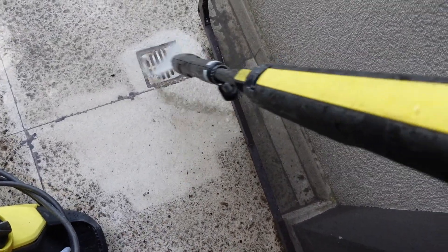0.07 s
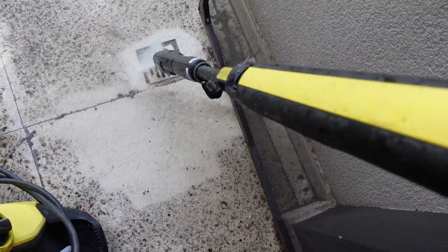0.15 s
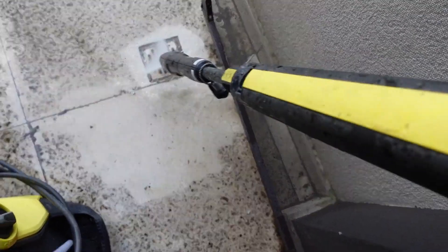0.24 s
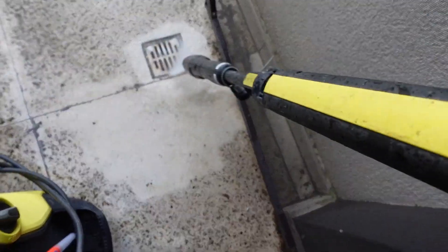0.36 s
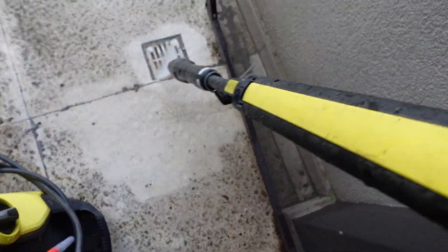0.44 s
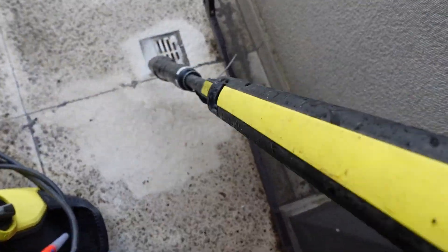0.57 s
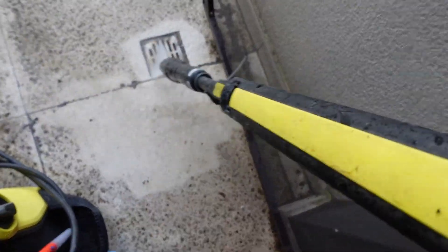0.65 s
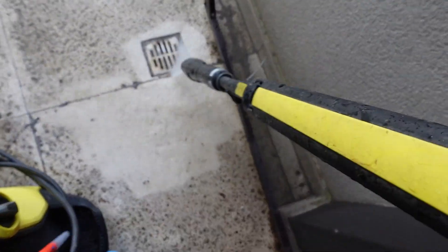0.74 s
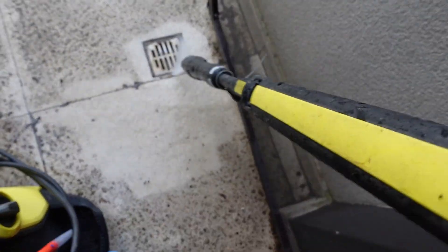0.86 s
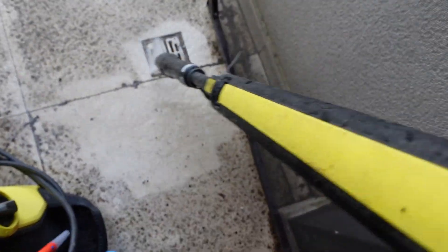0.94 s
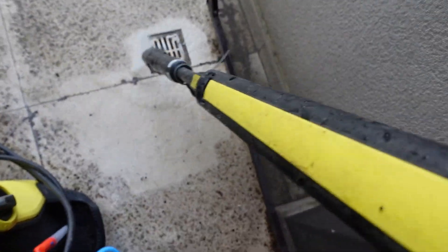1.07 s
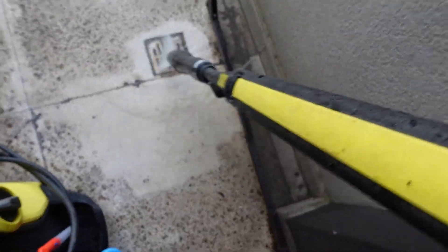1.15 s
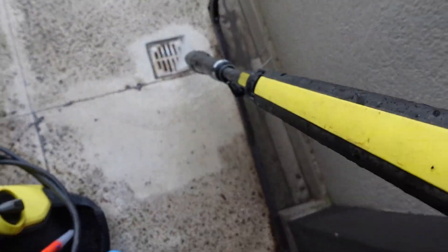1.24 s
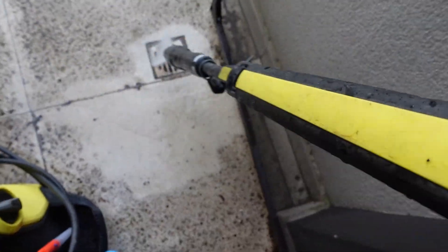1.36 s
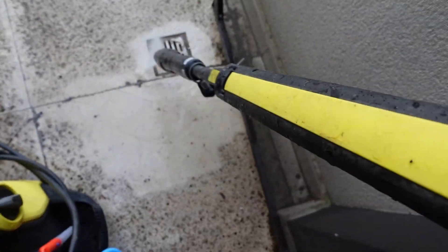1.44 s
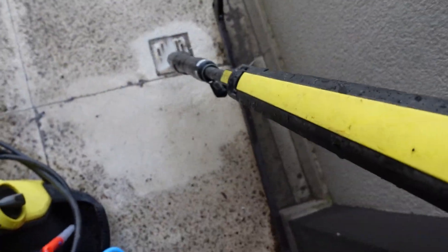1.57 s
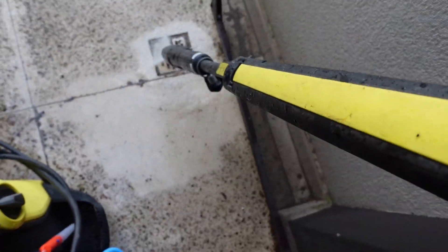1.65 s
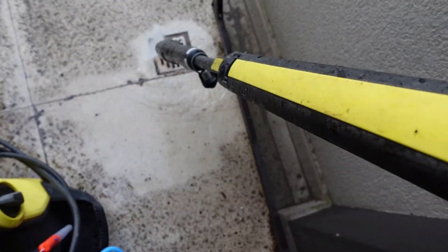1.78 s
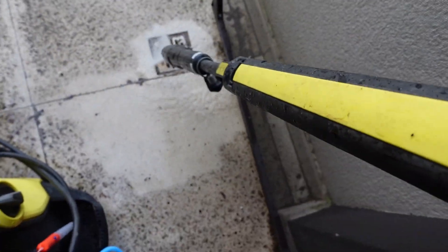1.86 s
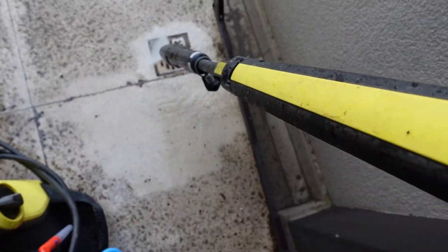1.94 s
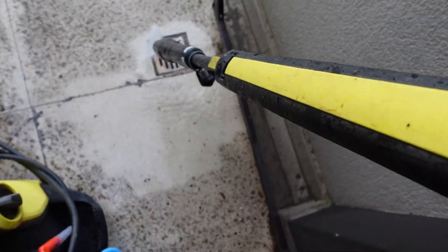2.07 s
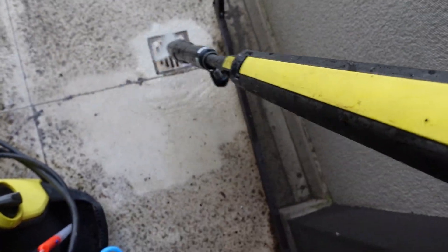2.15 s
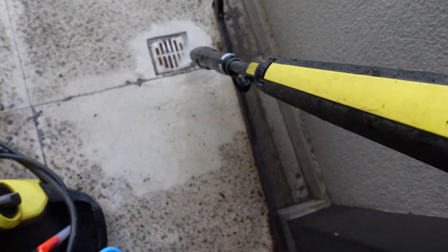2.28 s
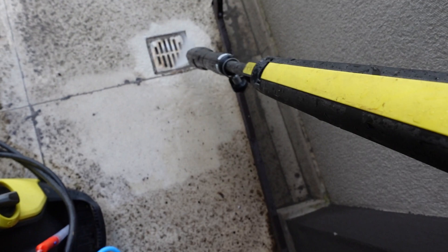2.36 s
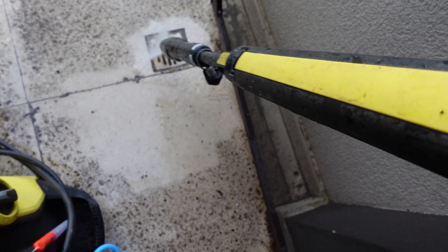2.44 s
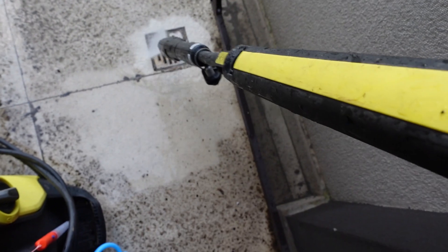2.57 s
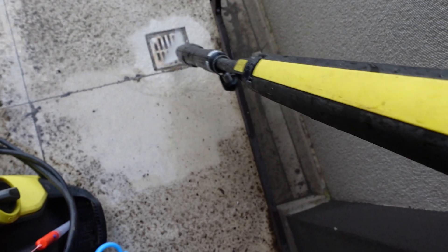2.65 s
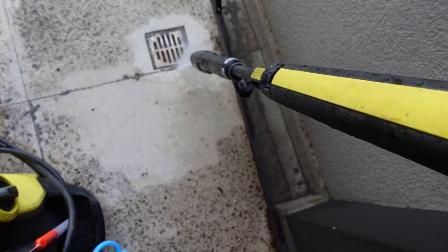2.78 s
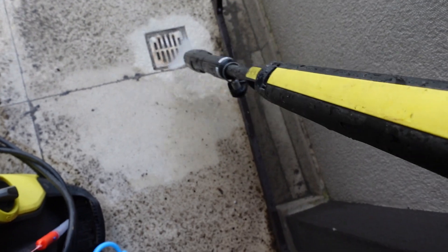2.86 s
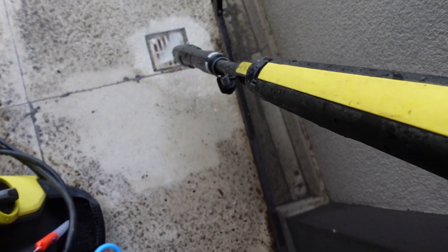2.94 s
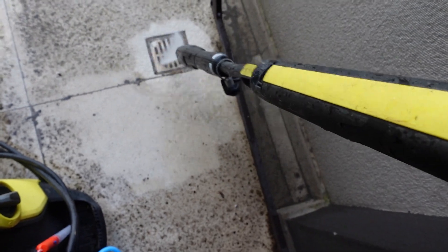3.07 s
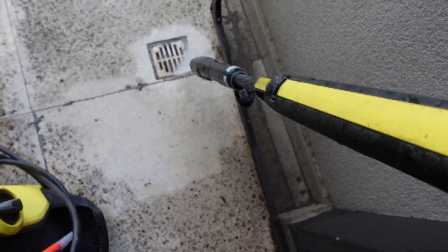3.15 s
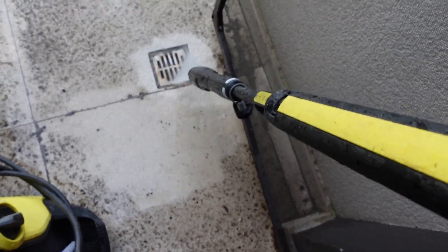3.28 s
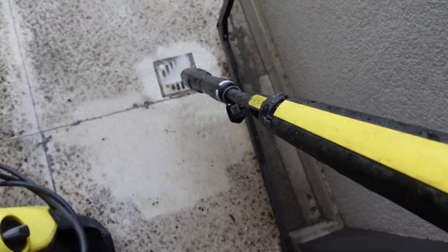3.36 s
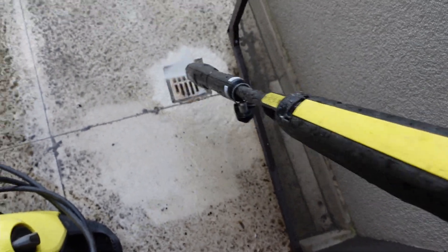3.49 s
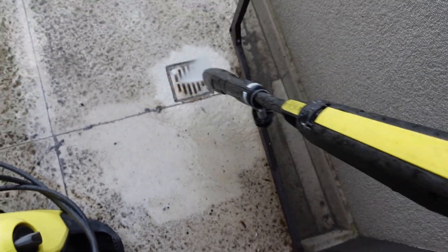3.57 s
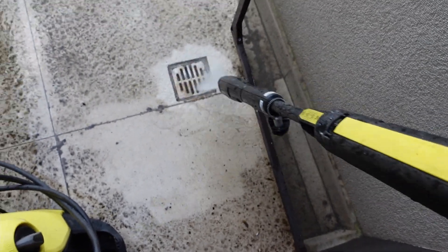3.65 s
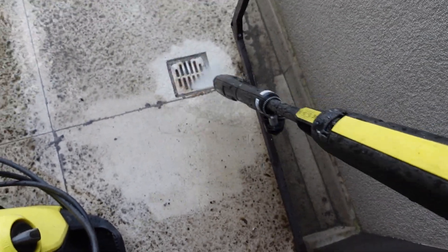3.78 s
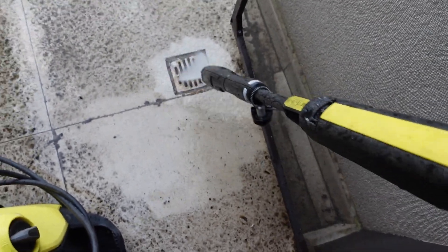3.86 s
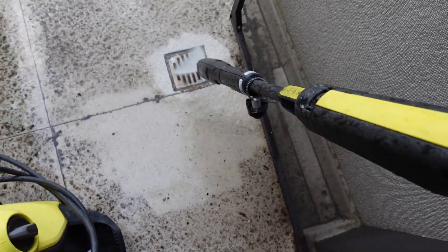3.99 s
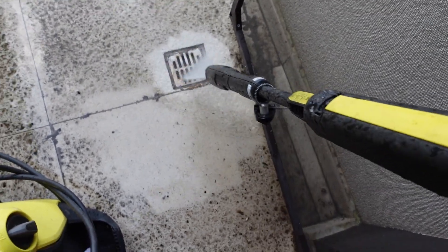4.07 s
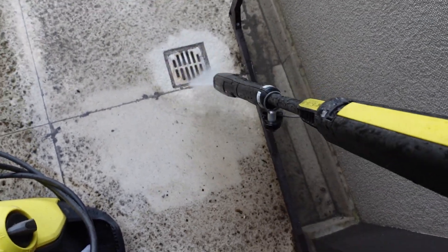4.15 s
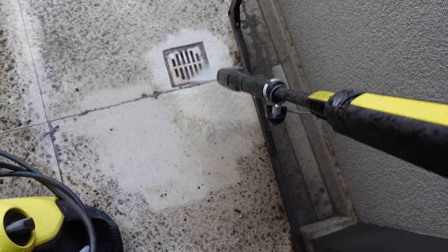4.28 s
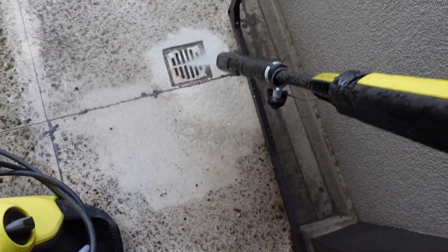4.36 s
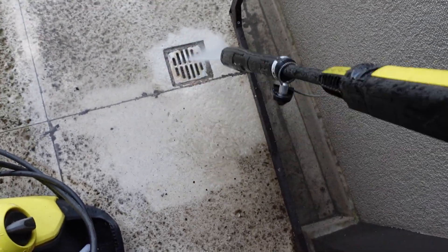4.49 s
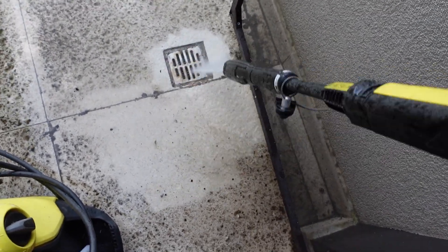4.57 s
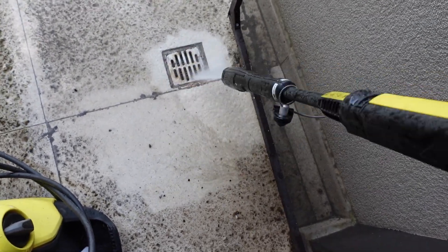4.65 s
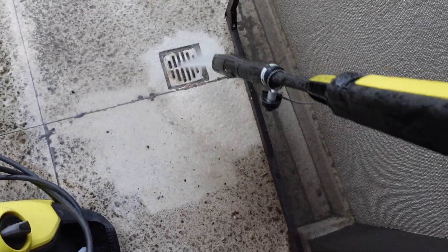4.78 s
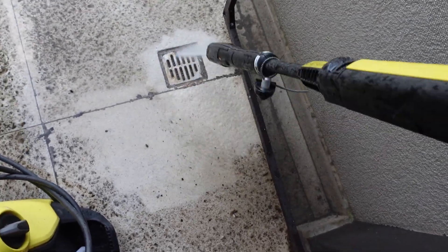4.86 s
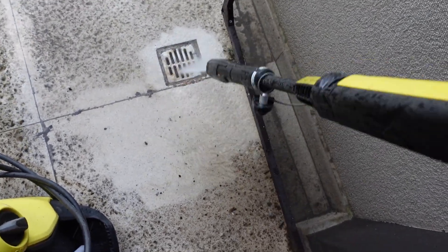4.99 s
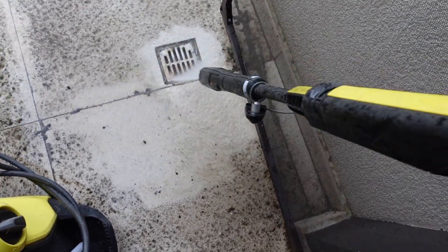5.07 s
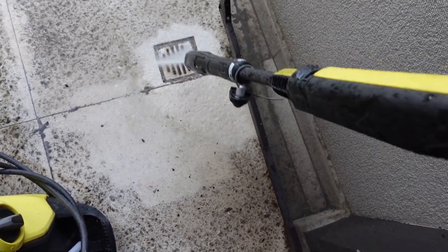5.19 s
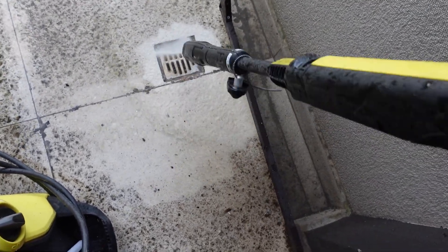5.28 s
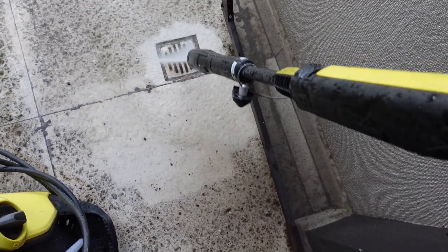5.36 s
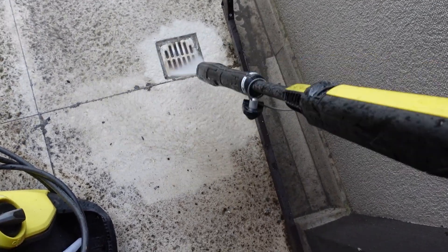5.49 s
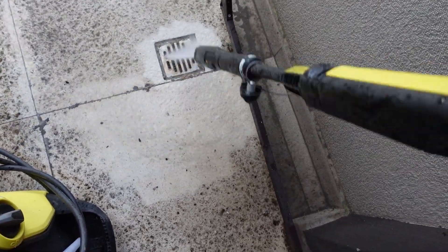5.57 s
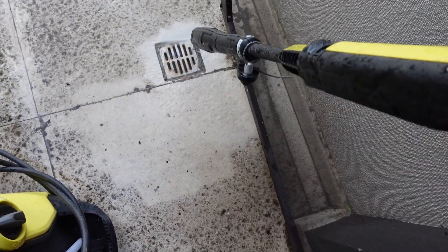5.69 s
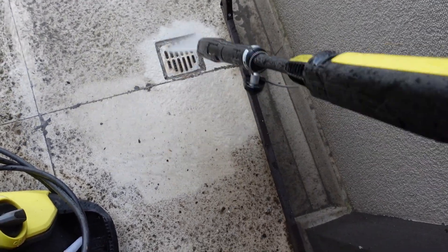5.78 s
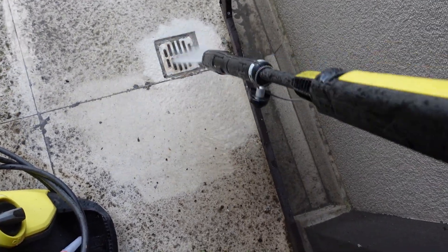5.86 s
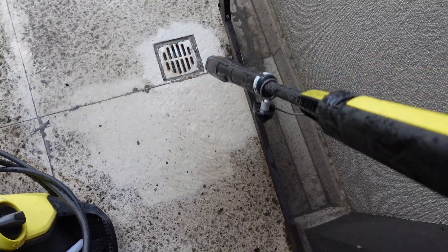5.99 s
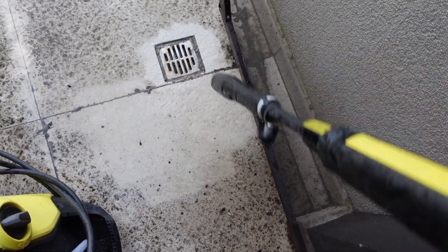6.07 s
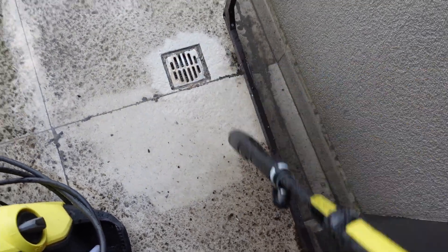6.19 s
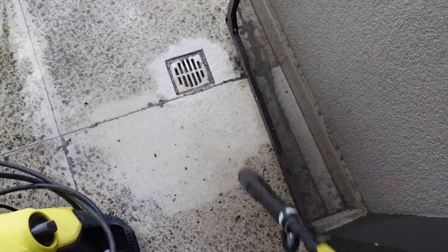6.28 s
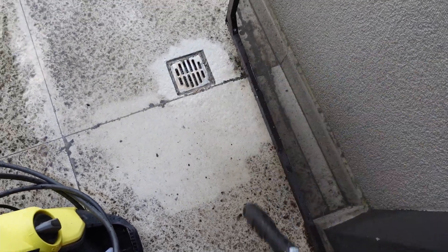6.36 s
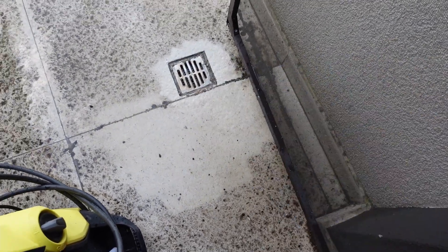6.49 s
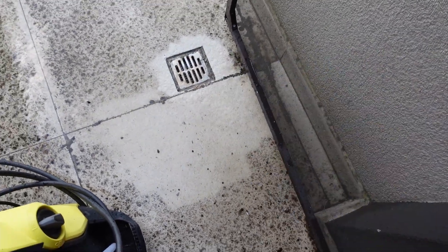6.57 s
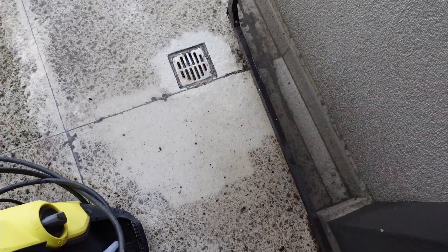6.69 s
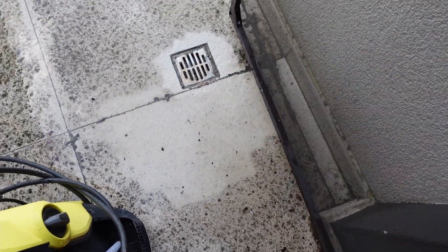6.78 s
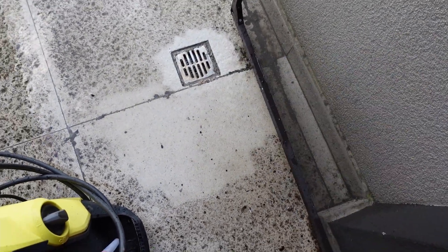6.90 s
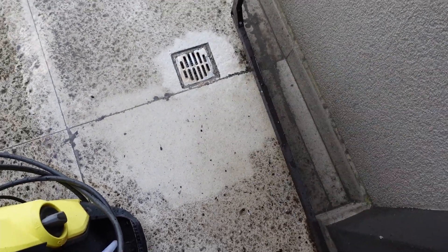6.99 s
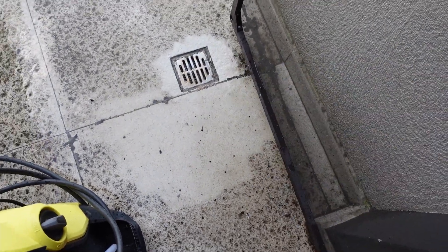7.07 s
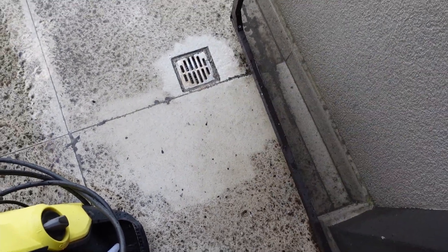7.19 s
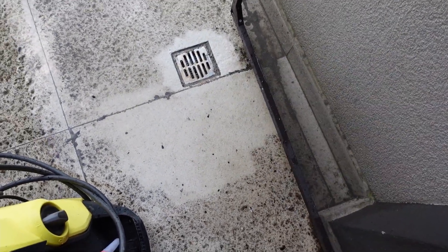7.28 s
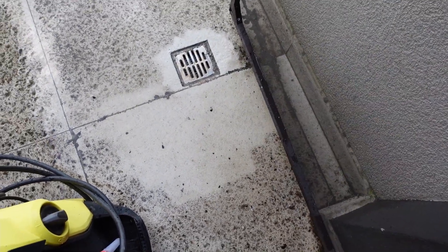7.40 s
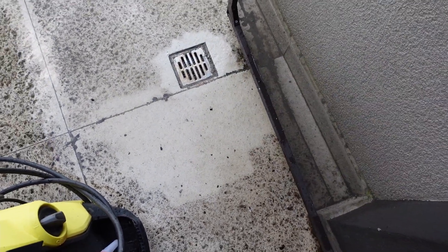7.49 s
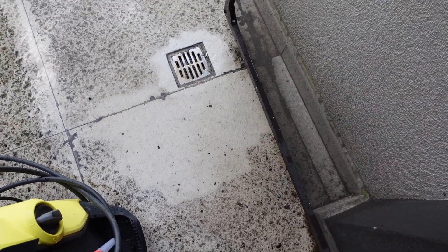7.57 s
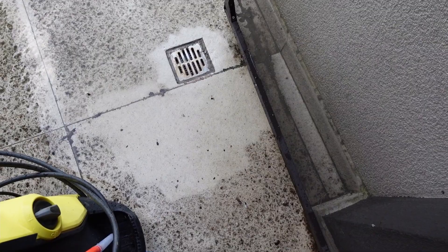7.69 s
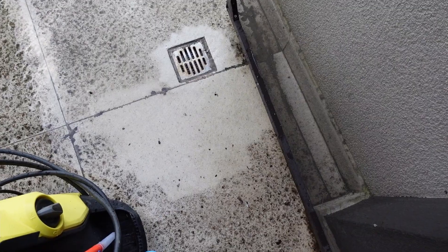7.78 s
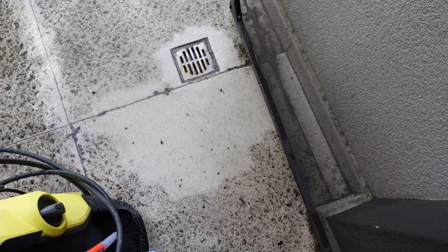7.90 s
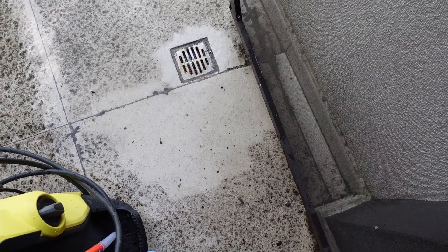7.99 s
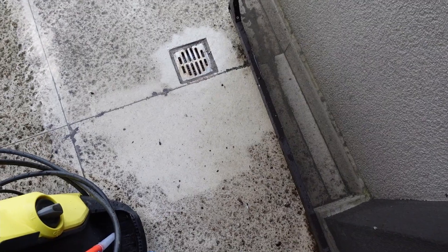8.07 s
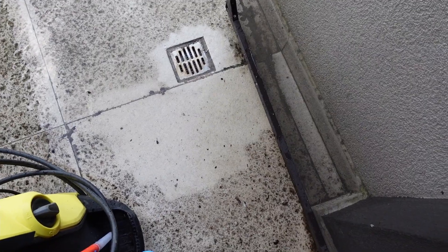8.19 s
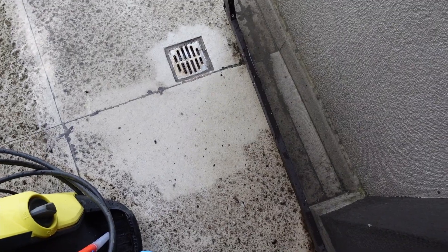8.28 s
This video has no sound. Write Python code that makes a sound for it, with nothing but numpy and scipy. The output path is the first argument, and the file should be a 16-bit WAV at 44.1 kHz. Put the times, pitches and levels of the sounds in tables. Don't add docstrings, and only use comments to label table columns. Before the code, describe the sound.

Steady electric pump hum and hissing water spray on a terrace stop abruptly at a trigger clack, leaving lance knocks and a faint dove.

```python
import sys
import numpy as np
from scipy import signal
from scipy.fft import rfft, irfft, next_fast_len
from scipy.io import wavfile
from scipy.ndimage import uniform_filter1d, map_coordinates

SR = 44100
rng = np.random.default_rng(int(sys.argv[2]) if len(sys.argv) > 2 else 0)


def boost_factor(decibels):
    exponent = np.asarray(decibels, float) / 20
    return 10 ** exponent


def int16_out(signal):
    q = np.round(np.clip(np.atleast_2d(signal).T, -1, 1) * 32767)
    wavfile.write(sys.argv[1], SR, q.astype(np.int16))


N = 367794
T = np.arange(N) / SR

# (time [s], share of full speed [1])
SHAFT_SPEED = [
    (0, 1),
    (5.98, 1),
    (6.04, 0.97),
    (6.09, 0.92),
]
SHAFT_HZ = 46.515
# (multiple of the shaft speed [1], level [dB])
PUMP_TONES = [(3, -47), (5, -46.5), (6, -30), (7, -39.5), (8, -41.5), (9, -32), (10, -49), (11, -30),
              (12, -32.5), (13, -23.5), (14, -34.5), (15, -36), (17, -34), (18, -33), (19, -38.5),
              (21, -43), (22, -42), (23, -43.5), (24, -42), (27, -37.5), (30, -36.5), (41, -40.5),
              (60, -42)]
# (frequency [Hz], level [dB])
WINDING_HUM = [(99.9, -62), (199.8, -47)]
# (time [s], level [dB])
PUMP_LEVEL = [
    (5.97, -0.13),
    (5.985, -3),
    (6.01, -1.5),
    (6.04, 4),
    (6.072, 2.5),
    (6.08, -8),
    (6.14, -13),
    (6.2, -35.5),
    (6.25, -91),
]
# (frequency [Hz], level [dB])
CASING_COLOUR = [(15, -47), (30, -30), (70, -35), (100, -27), (130, -15.5), (227, -8.5), (300, -1),
                 (400, 1), (540, 3), (620, -3.5), (800, -21), (1100, -40), (2500, -120)]

# (time [s], level [dB])
JET_FLOW = [
    (5.975, -0.5),
    (5.98, 2),
    (5.985, -19.5),
    (6.03, -17),
    (6.08, -25.5),
    (6.11, -44),
    (6.13, -97.5),
]
# (time [s], echo frequency [Hz], echo level [dB])
NOZZLE_ECHO = [
    (0, 3480, 3),
    (.5, 3400, 4.5),
    (1.5, 3380, 2),
    (3.0, 3500, 2),
    (3.7, 3790, 1.5),
    (4.6, 4200, 2),
    (5, 3650, 2.5),
    (5.4, 3420, 3.5),
    (5.95, 4300, 5),
]
# (frequency [Hz], level [dB per Hz])
SPRAY_COLOUR = [(1100, -33.5), (1800, -5.5), (2360, -6), (2760, -1), (3520, -0.5), (5000, -3), (6540, -5),
                (9480, -9.5), (13200, -18.5), (15100, -24), (15900, -29)]
# (frequency [Hz], level [dB])
SPLASH_COLOUR = [(380, -36), (650, -1), (800, -3.5), (960, -4.5), (1270, -1), (1600, -2.5), (1920, -3),
                 (2340, -8.5), (2600, -15.5), (3400, -39.5)]
# (middle time [s], splash level [dB], half length [s])
PUDDLES = [(.06, -25.5, 0.032), (.35, -26, .1), (.75, -25.5, 0.046), (1.3, -24, 0.041), (1.63, -22, .06),
           (1.92, -27, 0.03), (2.3, -25, .12), (2.68, -24, 0.046), (3.07, -23, 0.11), (3.6, -27.5, 0.38),
           (4.0, -24.5, 0.14), (5.5, -25.5, 0.28), (5.95, -25, 0.11)]
# (middle time [s], level [dB], half length [s])
SLOTS = [
    (.65, -24.5, 0.078),
    (1.05, -22, .09),
    (1.55, -21, 0.22),
    (1.95, -23, .22),
    (2.6, -23, 0.26),
    (3.05, -24, .09),
    (4.03, -32.5, .15),
]
# (middle time [s], gurgle level [dB], half length [s])
DRAIN_PASSES = [(.17, -17.5, 0.079), (.3, -22.5, 0.17), (.65, -22, .06), (.98, -21, 0.023),
                (1.16, -25, 0.021), (1.39, -17.5, 0.024), (1.55, -27.5, 0.036), (1.68, -18.5, 0.021),
                (1.95, -20, 0.064), (2.17, -19.5, 0.024), (2.39, -23, 0.023), (2.51, -18, 0.031),
                (2.74, -23.5, 0.045), (2.91, -21, 0.024), (3.05, -20.5, 0.032), (3.41, -21.5, 0.085),
                (3.68, -22, 0.067), (3.96, -19, 0.094), (4.23, -18.5, 0.024), (4.45, -26, 0.018),
                (4.6, -21, 0.02), (4.91, -17, 0.036), (5.27, -18.5, 0.1), (5.67, -16, 0.038),
                (5.81, -20, 0.02)]
# (frequency [Hz], width [Hz], level [dB])
DRAIN_TONES = [(402, 76, -2), (508, 102, -1.5)]
SPRAY_DB, SPLASH_DB = -17, -23
TRICKLE_DB, SLOT_REST_DB = -32.5, -32.5
UPPER_DB, UPPER_LIFT = 0.5, 0.28
FIZZ_DB_PER_KHZ = 1.1

# (time [s], level [dB], pitch [Hz], time to fall 60 dB [s])
VALVE_CLACKS = [
    (5.977, -7.5, 1120, 0.023),
    (6.018, -11, 570, 0.027),
    (6.03, -11.5, 566, 0.014),
    (6.041, -13.5, 275, 0.041),
    (6.232, -33, 600, 0.045),
]
# (time [s], level [dB], pitch [Hz], time to fall 60 dB [s], left over right [dB])
DULL_KNOCKS = [(6.32, -57, 95, .3, 0), (6.703, -48, 250, .12, 0), (8.07, -52, 105, .12, 0),
               (8.17, -50, 100, .2, 0), (7.247, -50, 188.3, 0.046, 0), (6.702, -52, 4500, .08, -6),
               (6.722, -58, 7000, .1, -2), (7.691, -64, 7530, .15, -11), (7.70, -48, 1080, .06, 2),
               (7.886, -45, 1400, 0.4, -9), (7.995, -69, 7880, 0.0099, 3), (8.112, -50, 3520, .012, -.5),
               (8.143, -52, 4610, .03, -3), (8.146, -64.5, 10060, .015, -1.5), (8.16, -55, 4000, .25, -7)]
# (frequency [Hz], time to fall 60 dB [s])
WALL_DECAY = [(100, 0.29), (500, 0.56), (2000, 0.5), (6000, 0.27), (14000, .17)]
# (frequency [Hz], width [Hz], level [dB])
LANCE_TONES = [(430, 160, 0), (1305, 493, 5.5), (2440, 1090, -1), (4200, 1900, -9.5)]
# (time [s], level [dB], pitch [Hz], time to fall 60 dB [s])
LANCE_TAPS = [(6.7013, -32, 1218, 0.016), (6.703, -42, 430, .06), (6.7065, -40, 1450, 0.024),
              (6.739, -41, 1453, .015), (8.1123, -34, 1150, .01), (8.113, -47, 2150, .04),
              (8.139, -53, 4840, 0.022), (8.144, -49, 4760, .035), (8.1425, -50, 6460, .022),
              (8.143, -45, 3650, .018), (8.1466, -34, 1920, 0.016), (8.147, -44, 2100, 0.04),
              (8.159, -49, 3500, .03), (8.168, -50, 2150, .03), (6.64, -69, 2670, .6)]

# (frequency [Hz], level [dB per Hz])
TRAFFIC_COLOUR = [(15, -52), (30, -30.5), (60, -5.5), (100, 5), (200, 2), (300, -10), (450, -44.5),
                  (900, -120)]
# (frequency [Hz], level [dB])
AIR_COLOUR = [(200, -17.5), (350, -8), (500, 0), (700, -8.5), (920, 0.5), (1200, -8), (2000, -6),
              (2600, -14.5), (4000, -25), (8000, -44), (14000, -120)]
# (start [s], hold [s], level [dB])
SCUFFS = [
    (6.203, 0.22, -69),
    (6.76, 0.12, -65),
    (7.446, 0.1, -64.5),
    (7.748, .6, -75),
]
# (frequency [Hz], level [dB])
SCUFF_COLOUR = [(1500, -24), (2300, -1), (3900, 0), (5300, -6.5), (6200, -13), (7500, -29.5),
                (10000, -50.5), (15800, -78)]
# (start [s], hold [s], level [dB])
DOVE_COOS = [
    (7.251, 0.086, -59),
    (7.481, .2, -63),
    (7.788, .04, -68),
    (8.121, .15, -58),
]
TRAFFIC_DB, AIR_DB = -65.5, -64.5
RECOVER_S, RECOVER_DB_PER_S, RECOVER_TOP_DB = 7.08, 6.5, 14

# (frequency [Hz], likeness [1])
LEFT_RIGHT_LIKENESS = [(60, .9995), (150, .998), (300, .987), (550, .955), (950, .925), (2380, .935),
                       (5980, .9), (15000, .79)]


def unit(x):
    return x / np.sqrt(np.mean(x ** 2) + 1e-20)


def along(points, hz):
    f, v = np.transpose(points)
    return np.interp(np.log(hz + 1), np.log(f + 1), v)


def curves(rows):
    s, *cols = np.transpose(rows)
    return [np.interp(T, s, c) for c in cols]


def wobble(rate):
    coarse = T[::64]
    knots = rng.standard_normal(int(N * rate / SR) + 4)
    return np.interp(T, coarse, map_coordinates(knots, [coarse * rate]))


def filtered(x, response):
    m = next_fast_len(N + SR // 2)
    return irfft(rfft(x, m) * response(np.fft.rfftfreq(m, 1 / SR)), m)[..., :N]


def modes(peaks):
    def response(f):
        total = 0
        for k, (centre, width, db) in enumerate(peaks):
            damping = 1j * f * width
            total = total + (-1) ** k * boost_factor(db) * damping / (centre ** 2 - f ** 2 + damping)
        return total
    return response


def shape(spectrum):
    return lambda hz: boost_factor(along(spectrum, hz))


def mid_side_gain(hz):
    turn = np.arccos(np.clip(along(LEFT_RIGHT_LIKENESS, hz), -1, 1)) / 2
    return np.array([np.cos(turn), np.sin(turn)])


def fine(gain, depth_db, rate):
    pair = rng.standard_normal((2, N))
    mid, side = filtered(pair, lambda hz: gain(hz) * mid_side_gain(hz))
    return boost_factor(depth_db * wobble(rate)) * unit(np.array([mid + side, mid - side]))


def rush(gain, patchy_db, band=None):
    hz, t, z = signal.stft(rng.standard_normal((2, N), np.float32), SR, nperseg=512)
    field = uniform_filter1d(rng.standard_normal(z.shape[1:]), size=4, axis=0)
    field = uniform_filter1d(field, size=24, axis=1)
    colour = np.abs(gain(hz) * mid_side_gain(hz))[..., None]
    mid, side = z * colour * boost_factor(patchy_db * unit(field))
    z = np.array([mid + side, mid - side])
    scale = np.std(signal.istft(z[:, :, :200], nperseg=512)[1])
    moving = band(hz[:, None], t) if band else 1
    return signal.istft(z * moving, nperseg=512)[1][:, :N] / scale


def swells(rows, rest_db):
    step = T[::64]
    power = boost_factor(2 * rest_db)
    for s, db, half in rows:
        power = power + boost_factor(2 * db) * np.exp(-((step - s) / half) ** 2)
    return np.interp(T, step, 10 * np.log10(power))


def held(start, hold, db, attack, release):
    rise = np.minimum(T - start, 0) / attack
    fall = np.maximum(T - start - hold, 0) / release
    return boost_factor(db) * np.exp(rise - fall)


def ringing(control, stop, wet_db):
    s, db = np.transpose(control)

    def gain(hz, t):
        fade_db = np.maximum(-60 * np.clip(t - stop, 0, None) / along(WALL_DECAY, hz), -500)
        near = boost_factor(wet_db + fade_db)
        far = boost_factor(wet_db - 22 + 0.456 * fade_db)
        return np.hypot(boost_factor(np.interp(t, s, db)), near + far) / np.hypot(1, boost_factor(wet_db))
    return gain


def pump():
    speed = curves(SHAFT_SPEED)[0] + 0.00042 * wobble(3)
    turn = 2 * np.pi * SHAFT_HZ * np.cumsum(speed) / SR
    sway = [1 + 0.1 * wobble(12) for _ in range(4)]
    lines = []
    for i, (multiple, db) in enumerate(PUMP_TONES):
        tone = np.sin(multiple * turn + rng.uniform(0, 6.5))
        lines.append(boost_factor(db + 2.0) * sway[i % 4] * tone)
    hum = sum(boost_factor(db + 4.5) * np.sin(2 * np.pi * hz * T) for hz, db in WINDING_HUM)
    side = 0.08 * (sum(lines[5::2]) - sum(lines[6::2]))
    tonal = sum(lines) + hum + np.array([side, -side])
    rumble = boost_factor(-27.5) * fine(shape(CASING_COLOUR), depth_db=1, rate=14)
    tonal_gain = ringing(PUMP_LEVEL, 6.075, wet_db=-16)(500, T)
    rumble_gain = ringing(PUMP_LEVEL, 6.075, wet_db=-6)(300, T)
    return tonal_gain * tonal + rumble_gain * rumble


def jet():
    gurgle_db, whistle_db = swells(DRAIN_PASSES, TRICKLE_DB), swells(SLOTS, SLOT_REST_DB)
    echo_hz, echo_db = curves(NOZZLE_ECHO)
    upper_db = UPPER_DB + UPPER_LIFT * (whistle_db - SLOT_REST_DB)
    fizz_db = FIZZ_DB_PER_KHZ * (echo_hz - 3500) / 1000
    flow = ringing(JET_FLOW, 6.018, wet_db=-7)

    def bump(hz, centre_hz, width_hz):
        return np.exp(-((hz - centre_hz) / width_hz) ** 2)

    def band(hz, t):
        at = lambda v: np.interp(t, T, v)
        db = SPRAY_DB + at(echo_db) * bump(hz, at(echo_hz), 290)
        db = db + at(upper_db) * bump(hz, 4650, 280)
        db = db + at(fizz_db) * np.clip((hz - 7000) / 3000, 0, 1)
        lean_db = -2.1 * bump(hz, 5000, 4500) + 0.9 * (hz > 10000)
        return flow(hz, t) * boost_factor(db) * boost_factor(lean_db * np.array([[[0.5]], [[-0.5]]]))

    hiss = rush(shape(SPRAY_COLOUR), 1.01, band)
    splash_db = swells(PUDDLES, SPLASH_DB) + 0.67 * wobble(12)
    splash = boost_factor(splash_db) * rush(shape(SPLASH_COLOUR), 0.21, flow)
    slot_noise = fine(lambda f: modes([(2800, 230, 0)])(f) ** 2, depth_db=0.5, rate=13)
    whistle = boost_factor(whistle_db - 2.5) * flow(2800, T) * slot_noise
    pit_noise = fine(lambda f: modes(DRAIN_TONES)(f) ** 2, depth_db=-0.3, rate=30)
    gurgle = boost_factor(gurgle_db - 4.0) * flow(450, T) * pit_noise
    flutter = boost_factor(0.42 * wobble(6.1) + 0.54 * wobble(60))
    return flutter * (hiss + splash + whistle) + gurgle * boost_factor([[0.4], [-0.4]])


def knocks(rows):
    out, t = np.zeros((2, N + SR)), np.arange(SR // 4) / SR
    for s, db, hz, t60, *pan in rows:
        sos = signal.butter(3, [hz / 1.5, hz * 1.5], "band", fs=SR, output="sos")
        envelope = boost_factor(-60 * t / t60) * (1 - np.exp(-t / 0.0011))
        burst = signal.sosfilt(sos, rng.standard_normal(len(t)) * envelope)
        sides = boost_factor(db + np.sum(pan) * np.array([[0.5], [-0.5]]))
        out[:, round(s * SR):][:, :len(t)] += sides * burst / np.abs(burst).max()
    return out[:, :N]


def walls(x):
    hz, t, z = signal.stft(rng.standard_normal((2, SR)), SR, nperseg=256)
    fade_db = np.maximum(-60 * t / along(WALL_DECAY, hz)[:, None], -200)
    tail = signal.istft(z * boost_factor(fade_db), SR, nperseg=256)[1]
    side = 0.5 * (tail[1] - uniform_filter1d(tail[1], size=60))
    tail = tail[0] + np.array([side, -side])
    return signal.fftconvolve(x.mean(0)[None], tail / np.linalg.norm(tail[0]), axes=1)[:, :N]


def lance():
    t = np.clip(T - 6.702, 0, 2.5)
    decay = boost_factor(-60 * t / 0.11) + 0.16 * boost_factor(-60 * t / 1.02)
    blow = (t > 0) * decay * rng.standard_normal(N)
    body = filtered(blow, lambda f: modes(LANCE_TONES)(f) / (1 + 1j * f / 7000) ** 3)
    taps, t = np.zeros(N + SR), np.arange(SR // 4) / SR
    for s, db, hz, t60 in LANCE_TAPS:
        envelope = boost_factor(db - 60 * t / t60) * (1 - np.exp(-t / 0.00028))
        taps[round(s * SR):][:len(t)] += envelope * np.sin(2 * np.pi * hz * t)
    return (boost_factor(-32.5) * body / np.abs(body).max() + taps[:N]) * boost_factor([[-1.1], [1.1]])


def yard():
    gain_db = np.clip(RECOVER_DB_PER_S * (T - RECOVER_S), 0, RECOVER_TOP_DB)
    lean = boost_factor([[-0.6], [0.6]])
    traffic = boost_factor(TRAFFIC_DB + gain_db) * fine(shape(TRAFFIC_COLOUR), depth_db=0.3, rate=11)
    air = boost_factor(AIR_DB + gain_db) * rush(shape(AIR_COLOUR), patchy_db=2.5) * lean
    drag = sum(held(*row, attack=0.015, release=0.16) for row in SCUFFS)
    scuffs = drag * rush(shape(SCUFF_COLOUR), patchy_db=1) * lean
    coo = boost_factor(1.8 * wobble(35)) * sum(held(*row, attack=0.04, release=0.04) for row in DOVE_COOS)
    coo_hz = 498 + 2.8 * wobble(40)
    dove = coo * np.sin(2 * np.pi * np.cumsum(coo_hz) / SR)
    return traffic + air + scuffs + dove


def scene():
    hits = knocks(VALVE_CLACKS) + knocks(DULL_KNOCKS) + lance()
    return pump() + jet() + hits + boost_factor(-5.5) * walls(hits) + yard()


def band_limit(x):
    return signal.sosfilt(signal.butter(12, 15920, fs=SR, output="sos"), x)


def record(dry):
    hiss = filtered(rng.standard_normal(dry.shape), lambda hz: 1 / (1 + (hz / 8000) ** 2))
    x = dry + boost_factor(-75) * hiss
    x = x / (1 + np.abs(x / 0.98) ** 6) ** (1 / 6)
    mix = filtered(x, lambda hz: np.cos(np.pi / 2 * np.clip((hz - 15820) / 120 + 1, 0, 1)) ** 2)
    return band_limit(mix)


dry = scene()
out = record(dry)
int16_out(out)
```